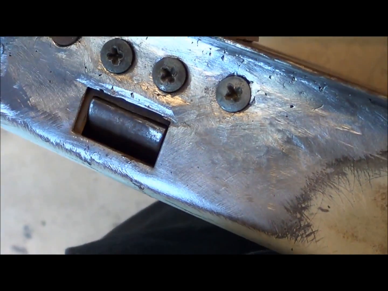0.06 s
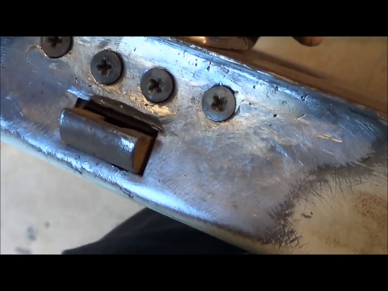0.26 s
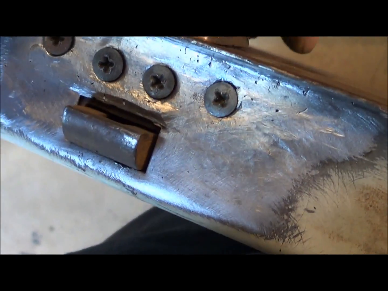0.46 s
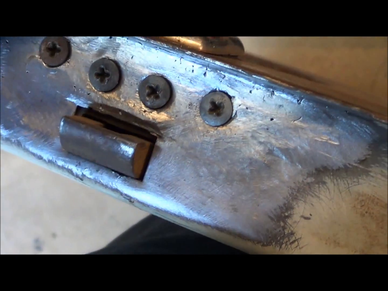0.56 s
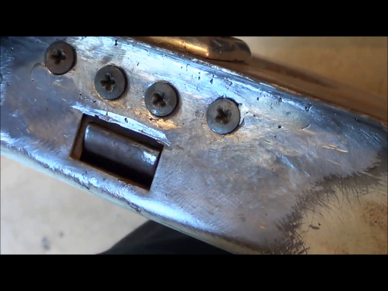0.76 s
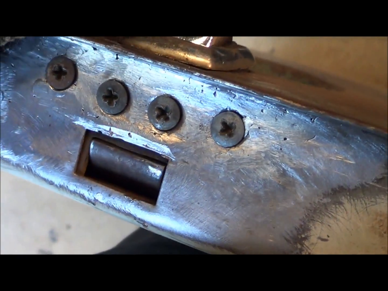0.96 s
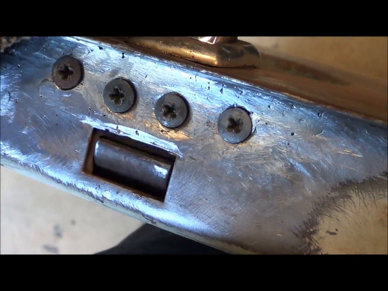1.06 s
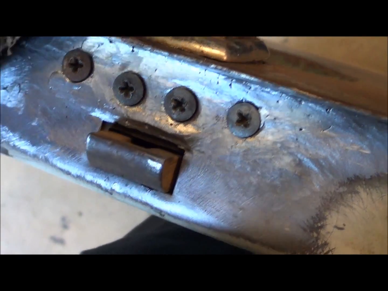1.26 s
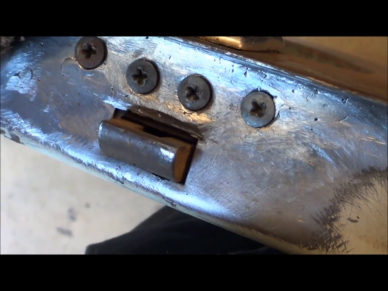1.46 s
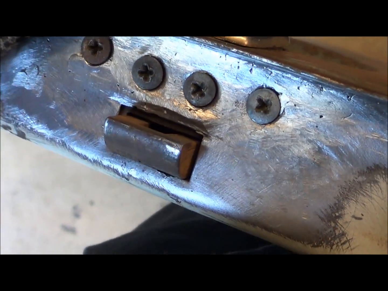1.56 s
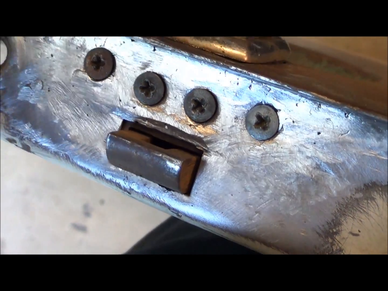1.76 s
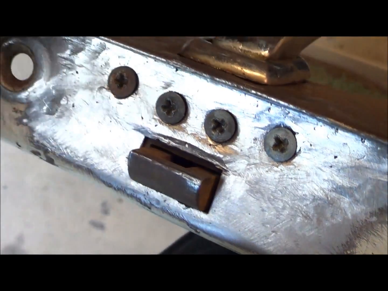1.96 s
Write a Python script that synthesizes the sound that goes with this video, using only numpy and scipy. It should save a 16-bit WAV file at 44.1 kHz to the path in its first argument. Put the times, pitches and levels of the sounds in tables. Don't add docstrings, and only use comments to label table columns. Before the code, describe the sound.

A metal door latch is worked by hand: a sharp rattling clack, a second snap, a scraping squeak and groan, then a heavy clunk booming in the hollow door, close-up in a quietly humming workshop.

```python
import sys
import numpy as np
from scipy import signal
from scipy.io import wavfile
from scipy.ndimage import uniform_filter1d, map_coordinates

SR = 44100
rng = np.random.default_rng(int(sys.argv[2]) if len(sys.argv) > 2 else 0)


def file_out(sig):
    cols = np.atleast_2d(sig).T
    lim = np.clip(cols, -1, 1)
    pcm = np.round(lim * 32767).astype(np.int16)
    wavfile.write(sys.argv[1], SR, pcm)


def volts_from_decibels(level):
    exponent = np.asarray(level, float) / 20
    return 10 ** exponent


N = 88200

# time [s], crack level [dB], crack centre [Hz], boom level [dB],
# boom centre [Hz].
HITS = [(.2115, -31, 3000, -20, 855), (0.2628, 0, 9900, -13.5, 816), (.2657, -4, 3180, -14, 1000),
        (0.2797, 9.5, 7300, -20, 790), (.291, -9.5, 3530, -34, 1300), (0.3, -2.5, 5030, -16, 720),
        (0.3215, 1.5, 8500, -17, 650), (.332, -4, 4670, -18.5, 706), (.365, -18, 4000, -28, 870),
        (0.408, -28, 5460, -51, 1210), (.45, -30, 8000, -57, 1200), (0.6766, 1.5, 6060, -16, 770),
        (.684, -6, 2980, -38, 1390), (.686, -5.5, 11000, -44, 1400), (.718, -26, 3350, -17.5, 406),
        (0.77, -23.5, 3000, -33, 327), (0.789, -21, 3400, -48, 400), (0.814, -22, 3430, -33, 400),
        (0.839, -16, 6000, -24.5, 480), (.922, -30, 6040, -46, 400), (0.996, -46, 4000, -28, 810),
        (1.051, -32, 8450, -24, 365), (1.143, -16, 8500, -18.5, 870), (1.203, -27, 4530, -38, 910),
        (1.2163, -9.5, 6500, -13, 950), (1.2402, 6.5, 6260, -17, 1160), (1.2682, -1, 12000, -18, 710),
        (1.2728, -2, 13200, -13.5, 780), (1.281, -5, 3000, -2.5, 726), (1.304, -13, 9200, -18, 780),
        (1.324, -9.5, 3870, -30, 700), (1.342, -18, 4000, -7.5, 563), (1.375, -22, 5400, -10, 670),
        (1.409, -23.5, 6400, -43, 600), (1.826, -49, 7740, -27, 454)]
# frequency [Hz], density [dB per Hz].
BOLT_COLOUR = [(880, 17), (1500, 10), (2690, 13), (3350, 9.5), (6500, -6), (8400, 15), (11100, -34),
               (13100, -2), (16000, -15)]
DOOR_PAN_DB = np.array([[-0.42], [0.42]])


def rms_one(x):
    return x / np.sqrt(np.mean(x ** 2) + 1e-20)


def at_hz(points, hz):
    table_hz, values = np.transpose(points)
    return np.interp(np.log(hz), np.log(table_hz), values)


def near(hz, centre_hz, octaves):
    return 1 / (1 + (np.log2(hz / centre_hz) / octaves) ** 4)


def drift(rate):
    points = rng.standard_normal(int(3 * rate) + 4)
    return map_coordinates(points, [np.arange(N) / SR * rate], order=3)


def ring(x, hz, t60):
    r, w = volts_from_decibels(-60 / (t60 * SR)), 2 * np.pi * hz / SR
    return signal.lfilter([0, np.sin(w)], [1, -2 * r * np.cos(w), r * r], x + 1e-18)


def fade(x, t60):
    return signal.lfilter([1], [1, -volts_from_decibels(-60 / (t60 * SR))], x + 1e-18)


def clicks(gains):
    out = np.zeros(N)
    out[(np.array(HITS)[:, 0] * SR).astype(int)] = gains
    return out


def band_noise(low, high):
    sos = signal.butter(2, [low, min(high, 20000)], "band", fs=SR, output="sos")
    return rms_one(signal.sosfilt(sos, rng.standard_normal(N)))


def bands(spectrum, gain_at):
    # frequency [Hz], likeness of left and right [0 to 1].
    likeness = [(60, 0.32), (240, 1), (950, 0.84), (3770, 0.9), (15000, 1)]
    edges = 24 * 2 ** np.arange(0, 9.6, .5)
    white = rng.standard_normal((2, 2, N))
    out, total = 0, 0
    for k, (low, high) in enumerate(zip(edges, edges[1:])):
        hz = np.sqrt(low * high)
        if spectrum[0][0] / 1.2 < hz < spectrum[-1][0] * 1.2:
            sos = signal.butter(2, [low, high], "band", fs=SR, output="sos")
            mid, side = signal.sosfilt(sos, white[k % 2])
            alike = np.clip(at_hz(likeness, hz), 0, .999)
            stereo = np.sqrt(1 + alike) * mid + np.sqrt(1 - alike) * side * [[1], [-1]]
            gain = volts_from_decibels(at_hz(spectrum, hz))
            out = out + gain * gain_at(hz) * stereo
            total += gain ** 2 * (high - low) * 2 / SR
    return out / np.sqrt(total)


def strokes(rows):
    t = np.arange(N) / SR
    level = 0
    for start, end, start_db, end_db in rows:
        times = [start - .02, start, end, end + 0.056]
        level = level + volts_from_decibels(np.interp(t, times, [-100, start_db, end_db, -100]))
    return level


def grit(slips_per_s, uneven_db):
    slips = rng.random(N) < slips_per_s / SR
    force = volts_from_decibels(uneven_db * np.minimum(rng.exponential(1, N), 5))
    return rms_one(slips * force * rng.choice([-1, 1], N))


def workshop():
    # frequency [Hz], density [dB per Hz].
    hiss_colour = [(25, -29), (90, -27.5), (274, -27), (318, -21), (354, 0), (386, -16), (618, -12.5),
                   (1690, -33), (15000, -45.5)]
    # time [s], level [dB].
    duck = [
        (1.24, 0),
        (1.3, -2),
        (1.7, -4),
        (2, 0),
    ]
    t = np.arange(N) / SR
    hum = volts_from_decibels(3.5 * drift(5)) * np.sin(2 * np.pi * 58 * t + .5 * drift(4))
    beating = 1 + .45 * np.cos(2 * np.pi * 13 * (t - .03))
    whine = np.sin(2 * np.pi * 15750 * t) * beating
    hiss = bands(hiss_colour, lambda hz: 1)
    room = volts_from_decibels(-41.5) * hiss + volts_from_decibels(-51) * rms_one(hum) + volts_from_decibels(-57) * whine
    return room * volts_from_decibels(np.interp(t, *np.transpose(duck)))


def slides():
    # start [s], end [s], level at start [dB], level at end [dB].
    bolt_strokes = [
        (.215, .263, -42.5, -26.5),
        (.58, .63, -55, -56.5),
        (.75, .83, -45, -38.5),
        (.83, .92, -47, -48.5),
        (1.19, 1.232, -43, -20.5),
        (1.275, 1.294, -28, -26.5),
        (1.305, 1.317, -25, -36),
        (1.72, 1.9, -62, -59.5),
    ]
    # start [s], end [s], level at start [dB], level at end [dB].
    hand_strokes = [
        (1.88, 2.02, -66, -46.5),
    ]
    # centre [Hz], width [Hz], level [dB].
    bolt_bands = [(8930, 2100, 3.5), (13100, 2600, -3.5)]
    rough = .5 + np.abs(uniform_filter1d(np.abs(grit(600, uneven_db=1.0)), size=130))
    bolt = bands(BOLT_COLOUR, lambda hz: 1)
    for hz, width, db in bolt_bands:
        bolt = bolt + volts_from_decibels(db) * band_noise(hz - width / 2, hz + width / 2)
    return strokes(bolt_strokes) * rough * bolt + strokes(hand_strokes) * band_noise(1000, 3630)


def squeak():
    # time [s], squeak level [dB], groan level [dB].
    pull = [
        (.95, -58, -38),
        (1.03, -44, -27),
        (1.06, -37, -18),
        (1.095, -42, -26),
        (1.15, -33, -28),
        (1.215, -36, -36),
    ]
    squeak_hz = [760, 880, 1230, 1480, 2010, 2320, 3920, 4900, 7870, 8350, 9300, 12200, 12450]
    # width [Hz], level [dB].
    squeak_peaks = [(45, -5), (39.8, -1), (60, -8), (45, -12.5), (40, -20.5), (100, -12), (100, -26),
                    (60, -26), (220, -15.5), (250, -14.5), (400, -22), (200, -31), (250, -24)]
    t = np.arange(N) / SR
    s, *columns = np.transpose(pull)
    times = [s[0] - .05, *s, s[-1] + 0.013]
    db, groan_db = [np.interp(t, times, [-90, *column, -90]) for column in columns]
    out = volts_from_decibels(2 + groan_db + drift(40)) * np.sin(2 * np.pi * 364 * t + .4 * drift(25))
    spring_stop_db = -20 * np.clip((t - 1.18) / .015, 0, 1)
    for hz, (width, level) in zip(squeak_hz, squeak_peaks):
        push = db
        if hz <= 3000:
            push = np.where(db > -60, -38 + 0.67 * (db + 37.0), db)
        if hz > 10000 or 3000 < hz < 6000:
            push = push + spring_stop_db
        patchy_db = 2.5 * drift(28.74)
        tone = rms_one(ring(grit(2900, uneven_db=2.5), hz, 5.1 / width / 1.67))
        out = out + volts_from_decibels(level + 13 + push + patchy_db) * tone
    return out + volts_from_decibels(db - 2.5) * bands(BOLT_COLOUR, lambda hz: 1)


def knocks():
    # time [s], frequency [Hz], level [dB], t60 [s].
    panel_knocks = [(.2112, 739, -18, 0.14), (.2112, 874, -25, 0.18), (0.2108, 1204, -23.5, 0.054),
                    (0.688, 314, -12.5, 0.077), (.717, 420, -7, 0.063), (.722, 283, -15, 0.24),
                    (.772, 280, -15, 0.11), (0.774, 415, -6.5, 0.054), (1.5, 477, -24.5, 6),
                    (.36, 421.2, -16, 0.25), (.731, 400, -6.5, 0.072), (1.359, 157.7, -29, 2),
                    (1.419, 215, -28, 2), (.37, 151.7, -31.5, 0.55)]
    # time [s], frequency [Hz], level [dB], t60 [s].
    part_pings = [(.2112, 3300, -26, .014), (.2112, 4700, -27, 0.0086), (.2657, 3680, -8, 0.016),
                  (0.2647, 1850, -29, 0.014), (.2657, 2780, -11, 0.01), (.2797, 8900, -7.5, 0.025),
                  (.2797, 6440, -3.5, 0.018), (.2797, 4280, -3, 0.02), (.3215, 8500, -12.5, 0.015),
                  (.332, 5600, -8, 0.0087), (.6766, 6280, -1, 0.011), (.6766, 4120, -7.5, 0.014),
                  (.6772, 2460, -12.5, 0.02), (.6775, 1220, -12, 0.053), (.6766, 8700, -8, .012),
                  (.6775, 9600, -9, .018), (.6766, 12200, -11.5, 0.014), (.6766, 15500, -15, .012),
                  (0.837, 8100, -24, 0.011), (.8375, 6180, -25.5, 0.011), (0.838, 905, -11, .02),
                  (1.143, 7890, -22, 0.049), (1.143, 12150, -25, .04), (1.2405, 9330, -8, 0.029),
                  (1.2402, 2120, -14.5, 0.12), (1.2405, 3900, -14, .03), (1.2682, 8900, -8, 0.009),
                  (1.2682, 10400, -9, 0.011), (1.2682, 12900, -13, .01), (1.2728, 13200, -12, 0.0082)]
    # frequency [Hz], level [dB], t60 [s].
    snap_parts = [(1800, -27, .06), (2500, -26, .06), (4050, -22, .03), (4300, -22, .04), (5600, -22, .2),
                  (5920, -21, .25), (6150, -19, .2), (6350, -19, .1), (6600, -21, .12), (8600, -22, .04)]
    t = np.arange(N) / SR
    out = np.zeros(N)
    for s, hz, db, t60 in panel_knocks + part_pings:
        decay = volts_from_decibels(db - 60 * np.maximum(t - s, 0) / t60)
        onset = np.clip((t - s) * hz / 1.4, 0, 1)
        out += decay * onset * np.sin(2 * np.pi * hz * (t - s))
    since_snap = t - .6765
    for hz, db, t60 in snap_parts:
        cluster = rms_one(ring(rng.standard_normal(N), hz, 2.2 / 260))
        decay = volts_from_decibels(db - 5.0 - 60 * np.maximum(since_snap, 0) / t60)
        out += (since_snap > 0) * decay * cluster
    return out


def cracks():
    # frequency [Hz], density [dB per Hz].
    rattle_colour = [(410, -64), (700, 18), (2960, -2), (4210, -9), (4610, -13), (6400, -9.5), (7690, -9.5),
                     (9110, 0), (16000, -49.5)]
    # frequency [Hz], t60 [s].
    rattle_t60 = [(700, 1), (2000, 0.27), (5000, 0.19), (10000, 0.1), (16000, 0.081)]
    _, crack_db, centre_hz, *_ = np.transpose(HITS)

    def envelope(hz):
        hit = clicks(volts_from_decibels(crack_db) * near(hz, centre_hz, 1.2))
        t60 = at_hz(rattle_t60, hz)
        rattle = fade(hit ** 2, t60 / 2)
        echo = volts_from_decibels(2 * -12.5) * fade(hit ** 2, 2.58 * t60 / 2)
        return fade(hit, 0.0039) + volts_from_decibels(-3) * np.sqrt(rattle + echo)

    return .5 * bands(rattle_colour, envelope)


def door():
    # frequency [Hz], density [dB per Hz].
    door_colour = [(59, -65), (100, -1), (145, -19), (292, -2.5), (381, -7), (423, -8), (702, -9.5),
                   (756, -9.5), (3500, -18.5), (4550, -67), (7700, -120)]
    # frequency [Hz], t60 [s].
    door_t60 = [(100, 3.65), (300, 1.62), (600, 0.85), (1200, 0.74), (3500, 0.45)]
    # frequency [Hz], level [dB].
    strong_modes = [(159, -44), (218, -42), (283, -43), (301, -44), (357, -40), (420, -45), (472, -40),
                    (525, -42), (647, -44), (714, -41)]
    swell_s, mode_octaves = 0.017, 0.76
    *_, boom_db, centre_hz = np.transpose(HITS)
    modes = []
    for hz in np.geomspace(110, 3400, 190) * rng.uniform(.99, 1.01, 190):
        db = at_hz(door_colour, hz) + 10 * np.log10(hz / 600) - 8
        modes.append((hz, db, at_hz(door_t60, hz)))
    for hz, db in strong_modes:
        modes.append((hz, db + 21.5, 1.56 * at_hz(door_t60, hz)))
    noise = rng.standard_normal((2, 8, N))
    mid, side = np.zeros((2, N))
    for k, (hz, db, t60) in enumerate(modes):
        push = clicks((volts_from_decibels(boom_db) * (near(hz, centre_hz, mode_octaves) + .075)) ** 2)
        push[0] = volts_from_decibels(2 * -29.5) * near(hz, 384, mode_octaves) ** 2
        shake = np.sqrt(fade(push, 5.3 * swell_s) / (swell_s * SR))
        mid += volts_from_decibels(db) * ring(shake * noise[0, k % 8], hz, t60)
        if k % 2:
            side += volts_from_decibels(db - 10) * ring(shake * noise[1, k % 8], hz, t60)
    return (mid + side * [[1], [-1]]) * volts_from_decibels(DOOR_PAN_DB)


def scene():
    latch = slides() + squeak() + knocks() * volts_from_decibels(DOOR_PAN_DB) + cracks() + door()
    bass_cut = signal.butter(6, 125, "high", fs=SR, output="sos")
    return workshop() + signal.sosfilt(bass_cut, latch)


def roll_off(x):
    return signal.sosfilt(signal.butter(12, 16860, fs=SR, output="sos"), x)


def record(dry):
    limit_db, release_db_per_s, attack_s, look_ahead_s = -1, 175, 0.00058, 0.0028
    over = np.maximum(20 * np.log10(np.abs(dry).max(axis=0) + 1e-9) - limit_db, 0)
    ramp = release_db_per_s * np.arange(N) / SR
    held = np.maximum.accumulate(over + ramp) - ramp
    r = np.exp(-1 / (attack_s * SR))
    gain = volts_from_decibels(-signal.lfilter([1 - r], [1, -r], held))
    gain = np.interp(np.arange(N) + look_ahead_s * SR, np.arange(N), gain)
    top_cut = signal.cheby2(10, 50, 17200, fs=SR, output="sos")
    return roll_off(signal.sosfilt(top_cut, np.clip(dry * gain, -1, 1)))


dry = scene()
out = record(dry)
file_out(out)
```